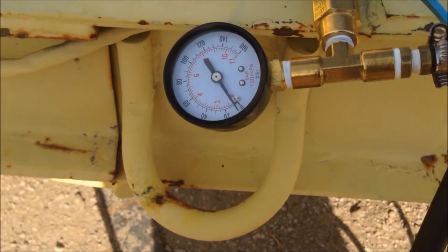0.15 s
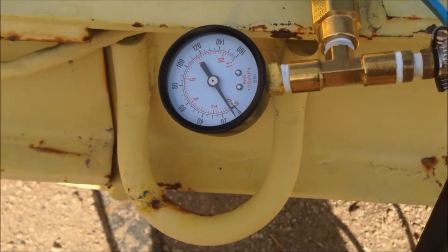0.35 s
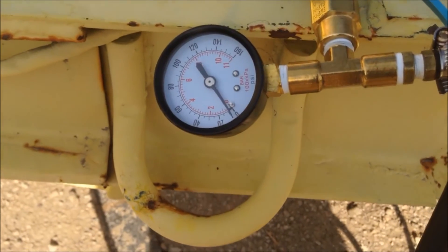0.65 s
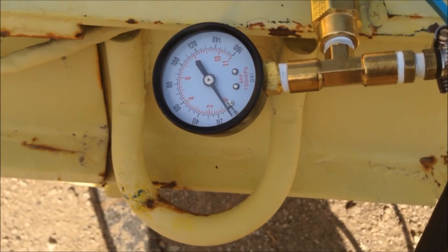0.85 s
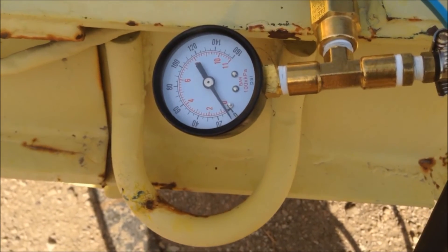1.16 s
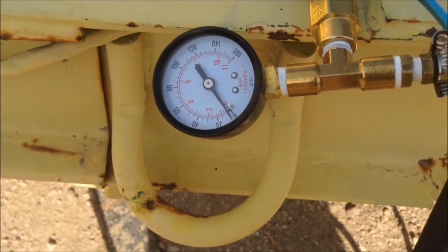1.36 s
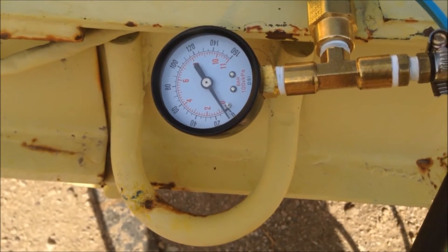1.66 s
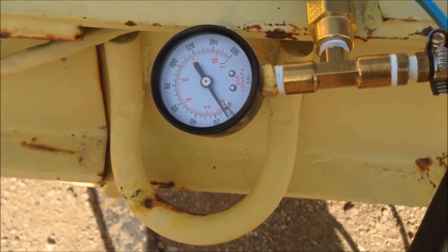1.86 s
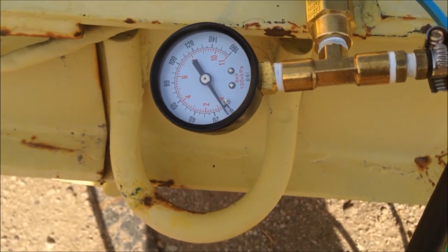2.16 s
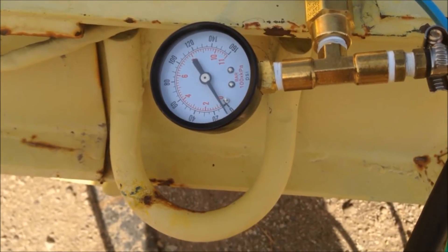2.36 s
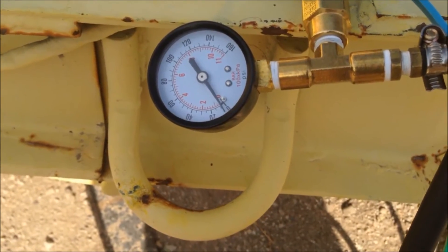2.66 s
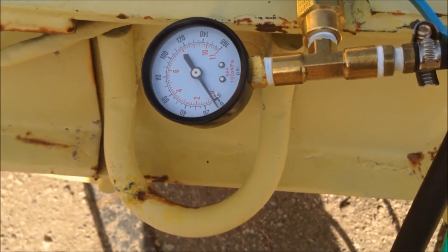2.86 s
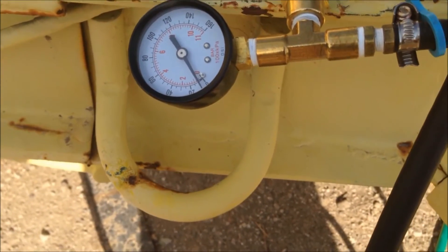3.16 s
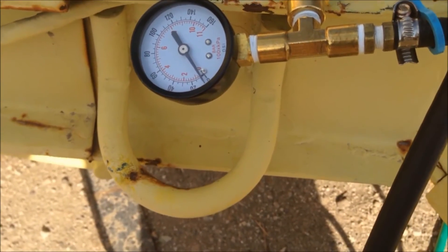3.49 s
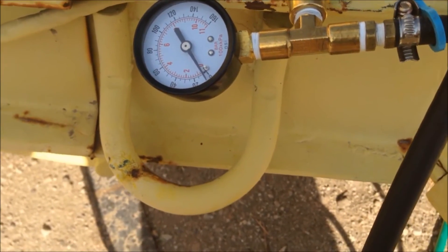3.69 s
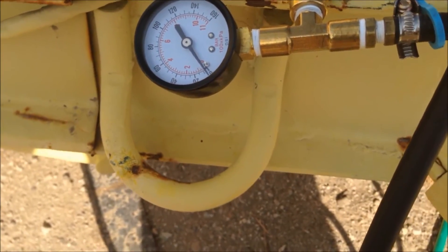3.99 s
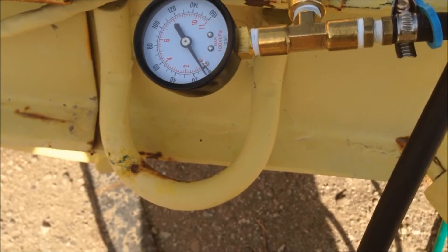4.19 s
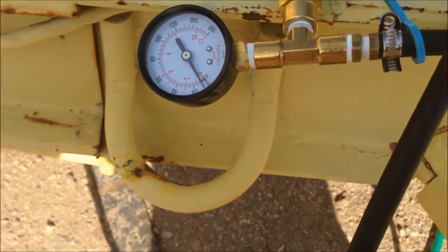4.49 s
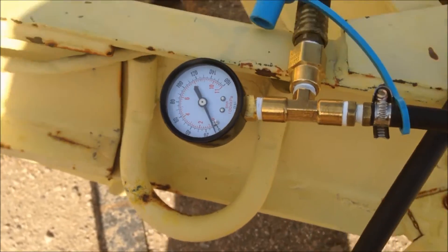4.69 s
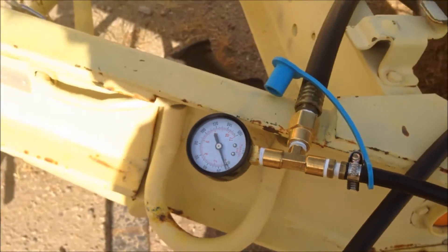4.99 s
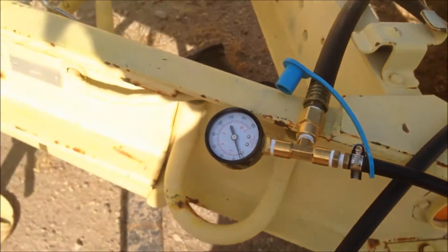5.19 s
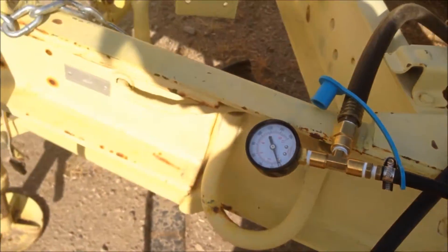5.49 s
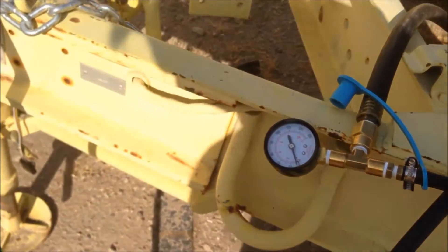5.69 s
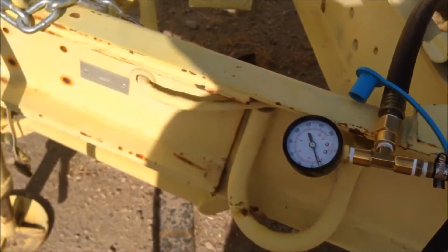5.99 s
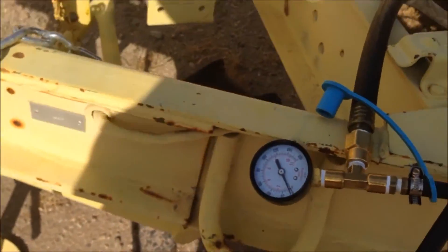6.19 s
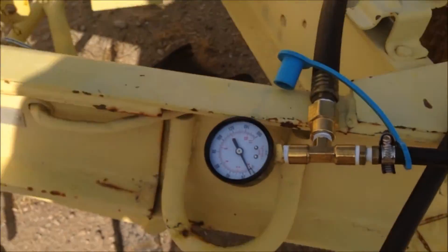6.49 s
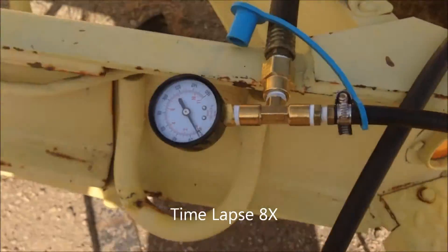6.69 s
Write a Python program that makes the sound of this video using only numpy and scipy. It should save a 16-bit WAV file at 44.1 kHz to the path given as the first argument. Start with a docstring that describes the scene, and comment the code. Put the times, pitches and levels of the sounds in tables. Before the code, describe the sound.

Loud, constant diesel engine hum with a fast throbbing boom, rattling knocks and fan hiss, holding one pitch until it stops dead.

```python
"""A six-cylinder diesel generator runs at a slightly wavering speed until the sound cuts off.
Its exhaust booms on the third harmonic of the firing rate: sines and filtered pulses locked to the crank.
The cylinders knock in turn, the valve gear ticks and a metal part taps, all as filtered noise bursts.
A belt-driven fan drones in sines and rushes in chopped noise; a deep random rumble lies underneath.
The fan's blade tone lies just under the boom, so the two beat nearly four times a second."""
import sys
import numpy as np
from scipy import signal
from scipy.fft import rfft, irfft, next_fast_len
from scipy.io import wavfile
from scipy.ndimage import uniform_filter1d, minimum_filter1d, map_coordinates

SR = 44100
rng = np.random.default_rng(int(sys.argv[2]) if len(sys.argv) > 2 else 0)


def materialize(psi):
    """Save the field psi as 16-bit PCM at rate SR to the path in sys.argv[1].

    A 1-D psi becomes a single channel; in a 2-D psi each row is a channel.
    """
    bounded = np.clip(np.atleast_2d(psi).T, -1, 1)
    quanta = np.round(bounded * 32767).astype(np.int16)
    wavfile.write(sys.argv[1], SR, quanta)


N = 302085

# Crankshaft speed. Each row: time in seconds, speed in rpm.
CRANK_RPM = [(0.0, 1290), (0.35, 1283), (1.2, 1272), (2.1, 1293), (2.7, 1276), (3.1, 1272), (3.7, 1293),
             (4.5, 1269), (5.2, 1281), (6.7, 1274)]
# Cylinders in firing order. Each row: relative exhaust puff in dB, relative knock in dB.
CYLINDERS = [(2, 3), (-3.5, 1), (3, 1.5), (3, 1.5), (-8, -5.5), (-1, 7)]
# Exhaust boom level. Each row: time in seconds, rms level in dB.
BOOM_LEVEL_DB = [(0, -11.5), (1.4, -10), (4.9, -10), (6.7, -10.5)]
# Weaker exhaust tones. Each row: multiple of the firing rate, rms level in dB.
FIRING_TONES = [(1, -34.5), (2, -22), (4, -27), (6, -37.5)]
# Fan tones, the eighth being the blade tone. Each row: multiple of the fan's speed, rms level in dB.
FAN_TONES = [(3, -36), (5, -30), (6, -27.5), (8, -24), (9, -33), (11, -48), (12, -46.5), (13, -49.5),
             (16, -35), (17, -47), (18, -39.5), (20, -50)]
# Fan hiss level before a 2 dB lift. Each row: time in seconds, level in dB.
HISS_LEVEL_DB = [(0, -41.5), (1, -42.5), (2.15, -39), (2.4, -42.5), (3.7, -39.5), (4.5, -42), (5.2, -39.5),
                 (6.6, -39.5)]
# Deep rumble level. Each row: time in seconds, rms level in dB.
DEEP_LEVEL_DB = [(0, -38.5), (.7, -37.5), (1.35, -33), (2.2, -33), (2.7, -37), (3.3, -34), (4.5, -35),
                 (6.0, -36.5), (6.7, -39)]
# Spectral shapes of the layers. Each row: frequency in Hz, relative density in dB per Hz.
PIPE_SHAPE = [(20, -23), (60, -11.5), (105, 4), (150, -3.5), (200, 1), (250, -5.5), (320, -10.5),
              (500, -19.5), (1000, -57)]
EXHAUST_RUMBLE_SHAPE = [(10, -28.5), (30, -14.5), (55, -4.5), (95, -2), (140, -6.5), (162, 4), (190, -1.5),
                        (220, 2.5), (255, -7), (300, -7), (450, -16.5), (1200, -50.5)]
BLOCK_SHAPE = [(150, -31), (400, 3), (570, 4.5), (800, 1.5), (1100, 0.5), (1500, -2.5), (1850, 0.5),
               (2250, -3.5), (2850, -9.5), (4000, -16), (7000, -28), (15000, -44.5)]
VALVE_SHAPE = [(800, -37), (2200, 2), (2800, 1), (3200, 4.5), (4200, 4), (6500, -9), (10000, -18),
               (15000, -27)]
FAN_RUSH_SHAPE = [(100, -18), (300, -2), (380, 3), (440, -6), (560, 1), (900, -4.5), (1500, -8),
                  (2100, -9.5), (2900, -20), (5000, -28), (15000, -52)]
HISS_SHAPE = [(1000, -5), (3200, 1), (5000, -1), (8000, -6.5), (10000, -13), (15000, -22)]
DEEP_SHAPE = [(10, -18), (25, -11.5), (45, 1.5), (65, -0.5), (110, -11), (300, -52)]
# Steel frame resonances, negative where its echoes cancel.
# Each row: centre in Hz, width in Hz, gain close up in dB, gain a step back in dB.
FRAME_MODES = [(520, 60, -1, 3), (707, 70, -1.5, -2.5), (790, 71, 2, -.5), (940, 60, -1.5, -4.5),
               (980, 40, 2.5, 4), (1100, 60, 0.5, 0.5), (1290, 150, -1, 1.5), (1550, 100, -1.5, -0.5),
               (1700, 60, -1, 1.5), (1796, 73, 1, 3), (1804, 57, -0.5, -1.5), (2150, 60, 4, -1.5),
               (2320, 60, 0, 3.5), (2490, 59, 3, 4), (2965, 99, -5, -2.5), (3080, 130, 2.5, 4.5),
               (4750, 300, -1, 0)]
# Microphone position. Each row: time in seconds, share of the way from close up to a step back (0-1).
STEP_BACK = [(4.5, 0.055), (5.2, 0.99), (6.1, 0.84), (6.7, 0.79)]

THROB_DB, THROB_AT_CYCLE = 1.0, 0.63  # boom swell: depth, and place in the engine cycle (0-1)
BOOM_WAVER_DB = 0.5
FAN_TURNS_PER_CRANK_TURN, FAN_START_TURNS = 1.10306, 0.057
GUSTS_PER_FAN_TURN = 5
DEEP_SURGE_DB, DEEP_SURGE_KNOTS_PER_S = 3, 9
STOP_S, TOP_HZ = 6.696, 15400


def amp(db):
    """Decibels to gain."""
    return 10 ** (np.asarray(db) / 20)


def unit(x):
    """Scale to rms 1."""
    return x / np.sqrt(np.mean(x ** 2) + 1e-20)


def curve(rows):
    """One value per sample from (s, value) rows."""
    return np.interp(np.arange(N) / SR, *np.transpose(rows))


def wobble(knots_per_s):
    """A smooth random curve: a spline through normal random knots."""
    knots = rng.standard_normal(int(N * knots_per_s / SR) + 4)
    return map_coordinates(knots, [np.arange(N) * knots_per_s / SR])


def coloured(x, shape):
    """x through a causal, minimum-phase filter with the (Hz, dB) shape, at rms 1."""
    m = 2 * next_fast_len(N // 2 + 8192)
    hz, db = np.transpose(shape)
    gain = amp(np.interp(np.log(np.fft.rfftfreq(m, 1 / SR) + 1), np.log(hz), db))
    # folding the cepstrum onto positive time gives minimum phase
    cepstrum = irfft(np.log(gain))
    cepstrum[1:m // 2] *= 2
    cepstrum[m // 2 + 1:] = 0
    response = np.exp(rfft(cepstrum))
    return unit(irfft(rfft(x, m) * response)[:N])


def strokes(turns, sizes_db, scatter_db):
    """An impulse at each whole turn; the sizes repeat in order, each with random scatter."""
    at = np.flatnonzero(np.diff(np.floor(turns)) > 0)
    out = np.zeros(N)
    out[at] = amp(np.resize(sizes_db, len(at)) + scatter_db * rng.standard_normal(len(at)))
    return out


def bursts(blows, t60_s):
    """Each blow sets off an exponentially dying burst of noise."""
    t = np.arange(SR // 8) / SR
    envelope = signal.fftconvolve(blows, amp(-60 * t / t60_s))[:N]
    return envelope * rng.standard_normal(N)


def tones(turns, rows, waver_db):
    """Sines locked to a rotation, each wavering in level on its own."""
    total = np.zeros(N)
    for multiple, db in rows:
        level = amp(db + waver_db * wobble(9))
        total += level * np.sin(2 * np.pi * round(multiple) * turns)
    return np.sqrt(2) * total


def exhaust(firings):
    """Firing tones and a throbbing boom; unequal puffs add a lope between them, over turbulent rumble."""
    lag_rad = np.pi / 4  # the pipe's resonance trails the pulses that drive it
    cycles = firings / len(CYLINDERS)
    throb_db = THROB_DB * np.cos(2 * np.pi * (cycles - THROB_AT_CYCLE))
    boom_level = amp(curve(BOOM_LEVEL_DB) + throb_db + BOOM_WAVER_DB * wobble(2.8))
    boom = boom_level * np.sqrt(2) * np.sin(2 * np.pi * 3 * firings - lag_rad)
    # only each puff's departure from the average puff makes the lope
    puffs = strokes(firings, np.transpose(CYLINDERS)[0], scatter_db=2.0)
    even = strokes(firings, [0], scatter_db=0)
    lope = coloured(puffs - even * puffs.sum() / even.sum(), PIPE_SHAPE)
    rumble = coloured(rng.standard_normal(N), EXHAUST_RUMBLE_SHAPE)
    return boom + tones(firings, FIRING_TONES, waver_db=1.6) + amp(-24.0) * lope + amp(-23.5) * rumble


def knock(firings):
    """Each combustion jolts the block, and loose parts rattle in its wake."""
    blows = strokes(firings - 0.15, np.transpose(CYLINDERS)[1], scatter_db=2.2)
    rattle = amp(1.5 * wobble(500))
    return amp(-27.5) * coloured(bursts(blows, t60_s=0.13) * rattle, BLOCK_SHAPE)


def valve_gear(firings):
    """Two valves seat for every firing, with slightly uneven timing."""
    seats = strokes(2 * firings + 0.1 * wobble(60), [0], scatter_db=1.0)
    return amp(-41.5) * coloured(bursts(seats, t60_s=0.06), VALVE_SHAPE)


def tapping(crank):
    """A bright metallic tap comes twice each crank turn, strong and weak by turns on average."""
    taps = strokes(2 * crank - 0.45, [1.5, -1.5], scatter_db=3.5)
    return amp(-43) * coloured(bursts(taps, t60_s=0.085), VALVE_SHAPE)


def fan(turns):
    """Eight unevenly spaced blades chop the cooling air, which hisses out through the radiator."""
    # the uneven blades bunch the air into gusts
    chop = 1 + 0.12 * np.sin(2 * np.pi * GUSTS_PER_FAN_TURN * turns)
    flutter = amp(0.94 * wobble(350) + 0.29 * wobble(12))
    rush = coloured(rng.standard_normal(N) * chop * flutter, FAN_RUSH_SHAPE)
    hiss = coloured(rng.standard_normal(N) * amp(1.2 * wobble(400)), HISS_SHAPE)
    hiss_level = amp(curve(HISS_LEVEL_DB) + 2)
    return tones(turns, FAN_TONES, waver_db=1) + amp(-24.5) * rush + hiss_level * hiss


def frame(x):
    """The steel frame colours the clatter, and the colour shifts as the microphone draws back."""
    hz = np.fft.rfftfreq(N, 1 / SR)
    db = np.zeros((2, len(hz)))
    for centre_hz, width_hz, close_db, back_db in FRAME_MODES:
        bell = 1 / (1 + (2 * (hz - centre_hz) / width_hz) ** 2)
        db += np.outer([close_db, back_db], bell)
    close, back = irfft(rfft(x) * amp(db), N)
    return close + np.clip(curve(STEP_BACK), 0, 1) * (back - close)


def deep_rumble():
    """Low-passed noise rumbles under the engine, surging at random."""
    surge = amp(DEEP_SURGE_DB * wobble(DEEP_SURGE_KNOTS_PER_S))
    return amp(curve(DEEP_LEVEL_DB)) * unit(surge * coloured(rng.standard_normal(N), DEEP_SHAPE))


def scene():
    """The crankshaft drives the engine and fan: three firings a turn, and the fan by its belt."""
    crank = np.cumsum(curve(CRANK_RPM)) / 60 / SR  # turns
    firings = 3 * crank
    fan_turns = FAN_TURNS_PER_CRANK_TURN * crank + FAN_START_TURNS
    machinery = knock(firings) + valve_gear(firings) + tapping(crank) + fan(fan_turns)
    return (exhaust(firings) + frame(machinery) + deep_rumble())[None]


def record(dry):
    """A limiter holds the peaks down, a 1 ms gate stops the sound dead, and a band limit follows."""
    needed = np.minimum(1, 0.97 / (np.abs(dry) + 1e-9))
    gain = uniform_filter1d(minimum_filter1d(needed, size=600), size=600)
    gate = np.clip((STOP_S - np.arange(N) / SR) / 0.001, 0, 1)
    in_band = np.fft.rfftfreq(N, 1 / SR) < TOP_HZ
    return irfft(rfft(dry * gain * gate) * in_band, N)


dry = scene()
out = record(dry)
materialize(out)
```